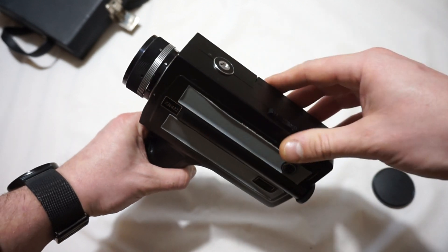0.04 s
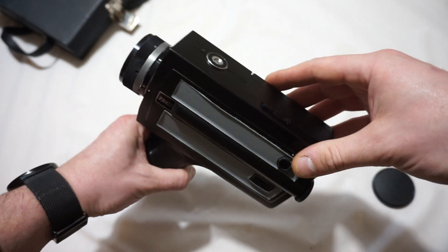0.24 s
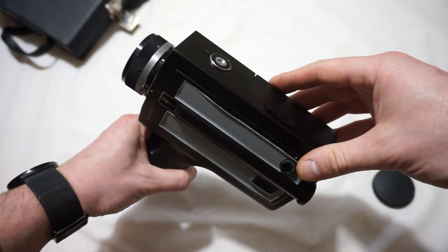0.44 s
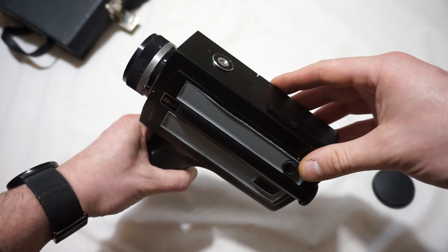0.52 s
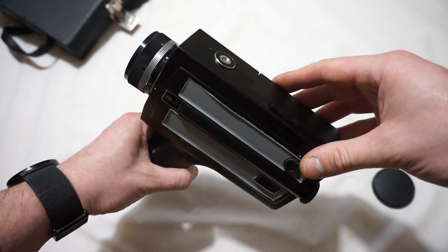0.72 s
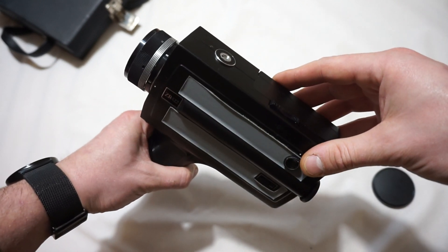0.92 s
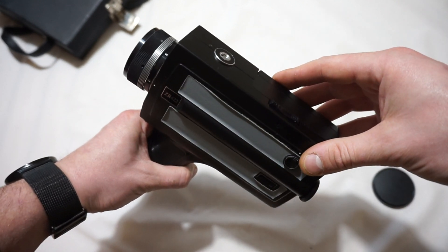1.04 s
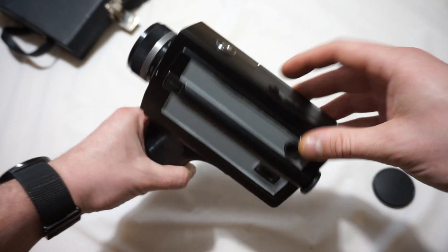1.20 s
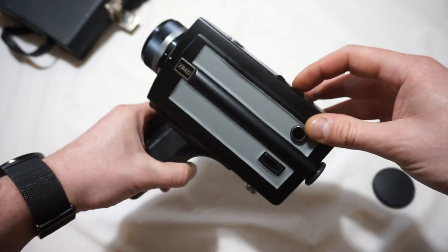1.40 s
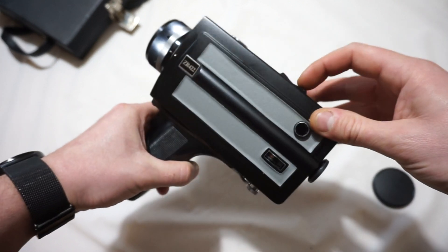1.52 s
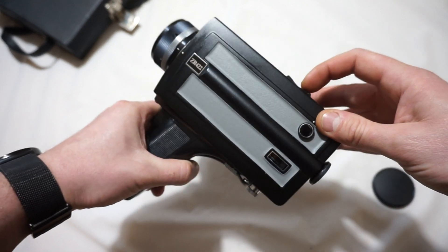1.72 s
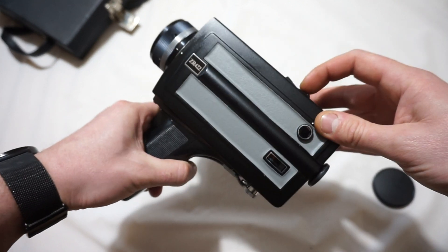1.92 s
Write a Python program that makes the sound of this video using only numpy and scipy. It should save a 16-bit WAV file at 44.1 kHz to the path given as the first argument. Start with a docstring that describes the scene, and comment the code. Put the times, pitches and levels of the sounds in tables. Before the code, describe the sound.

A small film camera starts with a bright trigger click at 0.2 seconds, close up in a quiet room. Its gears whir and hum under even ticking, about eighteen ticks a second. Around 1.2 seconds it stops with a loud, rattling clack. From 1.4 seconds hands faintly rub the case, with soft finger taps near 1.5 and 1.9 seconds. The room adds a short reverberation and faint steady noise.

```python
"""In a quiet room, a small hand-held film camera runs for a second close to the microphone.
The trigger clicks, the gears whirr and hum, and the film claw ticks about 18 times a second.
The mechanism stops with a loud clack; then the hands shift and tap on the case.
Each impact or rub is a noise excitation filtered by the resonances of the case or a broad spectrum.
The room adds a short reverberation to the impacts and the gear rattle, over a faint steady noise."""
import sys
import numpy as np
from scipy import signal
from scipy.fft import rfft, irfft, next_fast_len
from scipy.io import wavfile
from scipy.ndimage import map_coordinates

SR = 44100
rng = np.random.default_rng(int(sys.argv[2]) if len(sys.argv) > 2 else 0)


def master(y):
    """Save y as 16-bit WAV."""
    cut = np.clip(np.atleast_2d(y).T, -1, 1)
    pcm = np.round(cut * 32767)  # scale
    wavfile.write(sys.argv[1], SR, pcm.astype(np.int16))


N = 85995
TIME = np.arange(N) / SR


def amp(db):
    """Amplitude ratio: a factor of ten for every 20 dB."""
    return 10 ** (np.asarray(db) / 20)


def unit_rms(x):
    """Normalisation to a mean power of one."""
    return x / np.sqrt(np.mean(x ** 2) + 1e-20)


def over_frequency(points, hz):
    """Interpolation of (frequency, value) points on a logarithmic frequency axis."""
    f, v = np.transpose(points)
    return np.interp(np.log(hz + 1), np.log(f + 1), v)


def over_time(points):
    """Linear interpolation of (time, value) points at every sample."""
    return np.interp(TIME, *np.transpose(points))


def wobble(rate):
    """Slow random modulation: a spline through `rate` random values a second."""
    return map_coordinates(rng.standard_normal(int(N * rate / SR) + 4), [TIME * rate])


# The sound at the two microphones. Each row: frequency in Hz, left-right coherence from 0 to 1.
COHERENCE = [(100, 0.52), (600, 0.84), (1400, 0.73), (3000, 0.52), (12000, 0.54)]
# Each row: frequency in Hz, left minus right level in dB.
BALANCE = [(100, 0.5), (380, -3), (1300, 0.5), (2400, -1.5), (4400, 0.4), (8100, 3), (15000, 3)]

def coloured(pair, spectrum, modes=()):
    """Source-filter principle: two independent signals pass a minimum-phase filter into stereo."""
    size = 2 * next_fast_len(N)
    hz = np.fft.rfftfreq(size, 1 / SR)
    peaks = sum(amp(db) ** 2 / (1 + (2 * (hz - centre) / width) ** 2) for centre, width, db in modes)
    gain = unit_rms(amp(over_frequency(spectrum, hz)) * np.sqrt(1 + peaks))
    cepstrum = irfft(np.log(gain + 1e-6))
    cepstrum[1:size // 2] *= 2  # folding the cepstrum makes the filter causal
    cepstrum[size // 2 + 1:] = 0
    spread = np.arccos(np.clip(over_frequency(COHERENCE, hz), 0, 1)) / 2
    mid, side = rfft(pair, size) * np.exp(rfft(cepstrum)) * [np.cos(spread), np.sin(spread)]
    lean = amp(over_frequency(BALANCE, hz) / 2)
    return irfft(np.array([(mid + side) * lean, (mid - side) / lean]), size)[:, :N]


# Background spectrum. Each row: frequency in Hz, relative spectral level in dB.
AIR_SPECTRUM = [(25, -13), (70, -15), (140, -7), (190, -4), (260, -8), (450, -11.5), (600, -14),
                (1050, -12.5), (1290, 1.5), (1480, -15.5), (2000, -19.5), (5000, -26), (14000, -31),
                (15800, -24)]

def room_noise(level_db=-65):
    """Stationary noise: a narrow spectral peak is heard as a fan-like whine."""
    return amp(level_db) * coloured(rng.standard_normal((2, N)), AIR_SPECTRUM)


# Decay of the room's tail. Each row: frequency in Hz, 60 dB decay time (T60) in seconds.
ROOM_T60 = [(200, 0.43), (1200, 0.47), (3500, 0.49), (7000, 0.41), (14000, 0.26)]
# Reflected sound. Each row: frequency in Hz, left-right coherence from 0 to 1.
ROOM_COHERENCE = [(150, 0.52), (400, 0.83), (750, 0.97), (1400, 0.82), (3000, 0.85), (12000, 0.79)]

def reverberation(x, early_t60, early_db=-9, tail_db=-6.5, delay_s=.007):
    """Convolution with a room response: the table and near walls reflect first, then a tail decays."""
    hz, t, noise = signal.stft(rng.standard_normal((2, SR * 3 // 4)), SR, nperseg=256)
    tail = amp(-60 * t / over_frequency(ROOM_T60, hz)[:, None])
    early = amp(-60 * t / early_t60)
    fade = np.hypot(amp(tail_db) * unit_rms(tail), amp(early_db) * unit_rms(early))
    spread = np.arccos(np.clip(over_frequency(ROOM_COHERENCE, hz), 0, 1))[:, None] / 2
    mid, side = signal.istft(noise * fade * [np.cos(spread), np.sin(spread)], SR, nperseg=256)[1]
    response = np.array([mid + side, mid - side]) / np.sqrt(len(mid))
    delayed = np.pad(x, ((0, 0), (round(delay_s * SR), 0)))
    return signal.fftconvolve(delayed, response, axes=1)[:, :N]


# Hands sliding on the case. Each row: time in seconds, level in dB.
RUB_LEVEL = [(1.2, -96), (1.42, -66.5), (1.57, -63.5), (1.72, -68.5), (1.85, -70.5), (1.95, -72)]
# Each row: frequency in Hz, relative spectral level in dB.
RUB_SPECTRUM = [(30, -20.5), (180, -21), (290, -0.5), (400, -2.5), (560, -19), (1200, -16), (2000, -20.5),
                (3800, -24.5), (4600, -18.5), (5600, -26), (15000, -29)]

def hand_rub(uneven_db=1.3):
    """Friction noise: skin slides softly and unevenly over the case."""
    friction = rng.standard_normal((2, N)) * amp(over_time(RUB_LEVEL) + uneven_db * wobble(10))
    return coloured(friction, RUB_SPECTRUM)


# Case resonances. Each row: frequency in Hz, bandwidth in Hz, peak in dB relative to the broad spectrum.
CASE_MODES = [(336.4, 31, 5), (365, 30, 2.5), (499, 10, 14.5), (574.5, 9.5, 13.5), (690.6, 34, 7),
              (765, 104, -1), (903, 115, 4.5), (1012, 33, 0.5), (1308, 84, 9.5), (1583, 31, 7.5),
              (2313, 33, 4), (2535, 58, -1), (2890, 450, 0.5)]

def struck_case(contacts, spectrum, rise_s=0.00042):
    """Impact excitation: each contact is a decaying burst of chatter that rings the modes of the case."""
    force = np.zeros((2, N + SR))
    t = np.arange(SR // 10) / SR
    rise = 1 - np.exp(-t / rise_s)
    for start, db, t60 in contacts:
        burst = rise * amp(db - 60 * t / t60) * rng.standard_normal((2, len(t)))
        force[:, round(start * SR):][:, :len(t)] += burst
    return coloured(force[:, :N], spectrum, CASE_MODES)


# Fingers landing on the case. Each row: start in seconds, level in dB, T60 in seconds.
TAP_CONTACTS = [(1.499, -43.5, 0.015), (1.8715, -52, 0.046)]
# Each row: frequency in Hz, relative spectral level in dB.
TAP_SPECTRUM = [(100, -36), (550, -15), (800, -1), (1300, -2), (2500, -7), (5000, -17), (9000, -25),
                (15000, -34)]

def finger_taps():
    """Soft impact: a fingertip excites the case with little treble."""
    return struck_case(TAP_CONTACTS, TAP_SPECTRUM)


# Drive of the gear train, from start to stop. Each row: time in seconds, gain in dB.
MOTOR_EFFORT = [(.215, -20), (.258, -2.5), (.32, -5), (.42, -0.5), (.8, 0), (1.2, -0.5), (1.3, -1.5),
                (1.345, -42)]
MOTOR_ON_S, MOTOR_OFF_S = MOTOR_EFFORT[0][0], MOTOR_EFFORT[-1][0]
# Gear tones. Each row: frequency in Hz, level in dB at full effort.
GEAR_TONES = [(345, -71), (497, -69), (571, -61)]

def gear_hum(flutter_db=1.5, pitch_waver=0.01067):
    """Periodic vibration: the turning gears sing a few tones that waver in level and pitch."""
    tones = np.zeros(N)
    for hz, db in GEAR_TONES:
        level = amp(db + flutter_db * wobble(19.2))
        phase = 2 * np.pi * hz * np.cumsum(1 + pitch_waver * wobble(20)) / SR
        tones += level * np.sin(phase)
    turning = (TIME > MOTOR_ON_S) & (TIME < MOTOR_OFF_S)
    return np.ones((2, 1)) * tones * amp(over_time(MOTOR_EFFORT)) * turning


# Whirr of the gears. Each row: frequency in Hz, relative spectral level in dB.
GEAR_SPECTRUM = [(60, -43.5), (200, -24), (320, -11.5), (610, -12.5), (720, 0), (1200, -3.5), (1700, -7.5),
                 (3000, -7.5), (4100, -14), (5500, -15), (7000, -19), (10500, -19), (15000, -41)]

def gear_rattle(level_db=-44.5, teeth_per_s=420, jitter_s=.0008, scatter_db=2.5, tooth_t60=0.0096,
                load_db=6.5, load_decay_s=0.024):
    """Backlash: loose teeth rattle the case, harder under the load of each pull on the film."""
    times = np.arange(MOTOR_ON_S, MOTOR_OFF_S, 1 / teeth_per_s)
    timing, strength = rng.standard_normal((len(times), 2)).T
    samples = ((times + jitter_s * timing) * SR).astype(int)
    impulses = np.bincount(samples, amp(scatter_db * strength), N)[:N]
    contact = signal.fftconvolve(impulses, amp(-60 * TIME[:SR // 20] / tooth_t60))[:N]
    contact /= np.sqrt(np.sum(contact ** 2) / (SR * (times[-1] - times[0])))  # unit power while running
    load = sum((TIME > start) * np.exp(-abs(TIME - start) / load_decay_s) for start, _ in CLAW_STROKES)
    envelope = contact * amp(level_db + over_time(MOTOR_EFFORT) + load_db * load)
    return coloured(envelope * rng.standard_normal((2, N)), GEAR_SPECTRUM, CASE_MODES)


# The trigger being pressed. Each row: start in seconds, level in dB, T60 in seconds.
TRIGGER_CONTACTS = [(.2095, -35, 0.026), (.211, -24.5, 0.022), (.2185, -42, 0.011)]
# Each row: frequency in Hz, relative spectral level in dB.
TRIGGER_SPECTRUM = [(100, -33), (550, -42), (850, -4), (1350, -1.5), (1700, -13), (2200, -1), (3400, 3),
                    (4200, -11), (4950, -4.5), (5700, -13.5), (8500, -7.5), (10600, -3.5), (15500, -15)]

def trigger_click():
    """Temporal fusion: three hard contacts within 10 ms are heard as one bright click."""
    return struck_case(TRIGGER_CONTACTS, TRIGGER_SPECTRUM)


# One pull of the film per frame. Each row: start in seconds, gain in dB.
CLAW_STROKES = [(0.2569, -6.5), (0.3076, 0), (0.3631, 0.5), (.4178, 1.5), (0.474, 2), (0.5279, -0.5),
                (0.5826, 0), (0.6393, .5), (0.6927, 1.5), (0.7501, -0.5), (0.8059, -1), (.862, -2.5),
                (0.917, .5), (0.9737, 1.5), (1.030, -1), (1.086, -1.5), (1.142, -0.5), (1.1973, 3)]
# The claw engages, rebounds and returns. Each row: delay in the stroke in seconds, level in dB,
# T60 in seconds.
CLAW_CYCLE = [(0, -36, 0.038), (.0045, -41, .03), (.0265, -43.5, 0.068)]
# Spectra of the tick, thump and spring. Each row: frequency in Hz, relative spectral level in dB.
TICK_SPECTRUM = [(100, -38), (500, -25.5), (750, -2), (1200, -9), (1700, -2.5), (3000, -5), (4100, -5.5),
                 (5500, -1.5), (6700, -14.5), (9200, -12), (10400, -6.5), (12600, -11.5), (14100, -7),
                 (15500, -25)]
THUMP_SPECTRUM = [(100, -51), (580, -18.5), (720, -2.5), (1000, -1), (1330, -0.5), (1650, -13.5),
                  (3000, -21.5), (6000, -20), (15000, -44)]
SPRING_SPECTRUM = [(1000, -33), (9000, -37), (9900, 10.5), (10500, 15), (11100, -27), (12000, -20),
                   (15500, -8)]

def film_claw(scatter_db=1.5):
    """Intermittent motion: at every stroke the claw ticks, the case thumps and the spring rings."""
    def each_stroke(lag_s, db, t60):
        return [(start + lag_s, gain + db, t60) for start, gain in CLAW_STROKES]

    ticks = [(start + lag_s, gain + db + scatter_db * rng.standard_normal(), t60)
             for start, gain in CLAW_STROKES for lag_s, db, t60 in CLAW_CYCLE]
    return (struck_case(ticks, TICK_SPECTRUM)
            + struck_case(each_stroke(lag_s=0.002967, db=-34, t60=0.033), THUMP_SPECTRUM)
            + struck_case(each_stroke(lag_s=0.0068, db=-48, t60=0.073), SPRING_SPECTRUM))


# Sharp catch contacts and dull case knocks. Each row: start in seconds, level in dB, T60 in seconds.
CATCH_CONTACTS = [(1.221, -27.5, 0.087), (1.2375, -17, 0.043), (1.240, -15.5, 0.0083), (1.248, -45, 0.012),
                  (1.2715, -26, 0.027)]
KNOCK_CONTACTS = [(1.2245, -30, 0.024), (1.2285, -22.5, 0.0096), (1.24, -22.5, 0.028), (1.2555, -23, 0.016),
                  (1.258, -19.5, 0.01), (1.279, -32, 0.019), (1.3135, -30, 0.011), (1.385, -44, 0.017)]
# Their spectra. Each row: frequency in Hz, relative spectral level in dB.
CATCH_SPECTRUM = [(100, -33), (550, -19.5), (1100, 2.5), (1700, -1.5), (2600, 2), (3700, -6), (5200, -3.5),
                  (6500, -9), (11500, -6.5), (13300, -10.5), (15500, -17)]
KNOCK_SPECTRUM = [(100, -31), (300, -17), (580, -19.5), (750, 2.5), (1150, 6.5), (1600, -8.5), (2600, -8),
                  (4500, -12), (8000, -43), (15000, -38)]

def stop_clack():
    """Transfer of momentum: the catch arrests the mechanism and the case knocks."""
    return struck_case(CATCH_CONTACTS, CATCH_SPECTRUM) + struck_case(KNOCK_CONTACTS, KNOCK_SPECTRUM)


def scene(stop_reverb_db=-3):
    """Superposition of direct and reflected sound; the stop is a little drier than the running camera."""
    running = film_claw() + gear_rattle() + trigger_click() + finger_taps()
    stop = stop_clack()
    reflected = reverberation(running, early_t60=0.072)
    reflected += amp(stop_reverb_db) * reverberation(stop, early_t60=0.074)
    return running + stop + reflected + gear_hum() + hand_rub() + room_noise()


def record(dry, left_lead_s=.000011, top_hz=15850):
    """Arrival-time difference and band limiting: the left channel leads, and the top treble is cut."""
    size = next_fast_len(N + SR // 2)
    hz = np.fft.rfftfreq(size, 1 / SR)
    time_shift = np.exp(np.outer([1, -1], 1j * np.pi * hz * left_lead_s))
    return irfft(rfft(dry, size) * time_shift * (hz < top_hz), size)[:, :N]


dry = scene()
out = record(dry)
master(out)
```